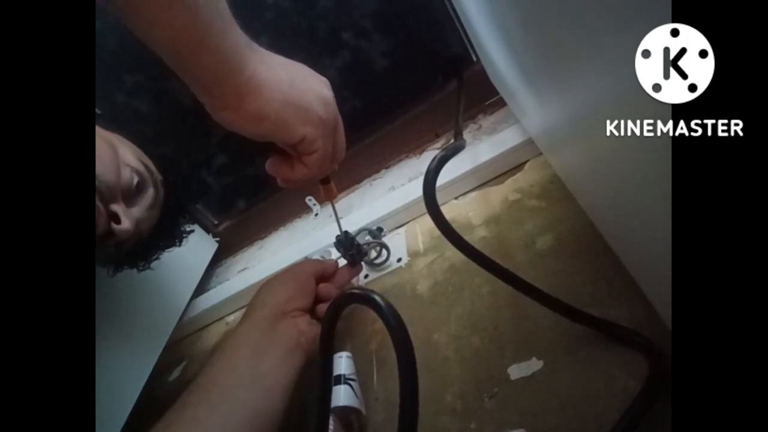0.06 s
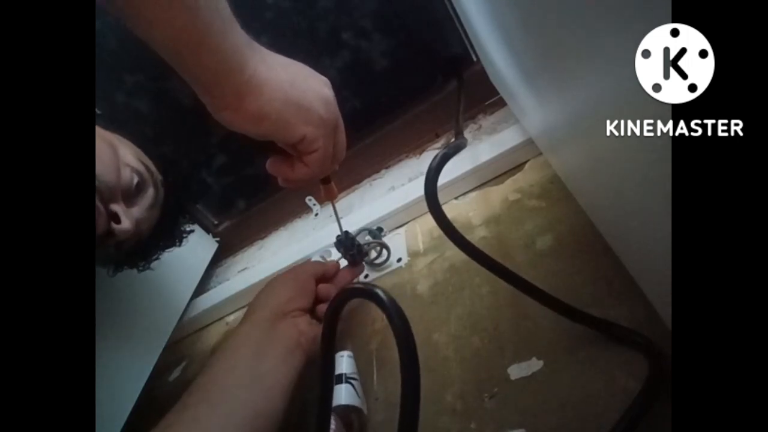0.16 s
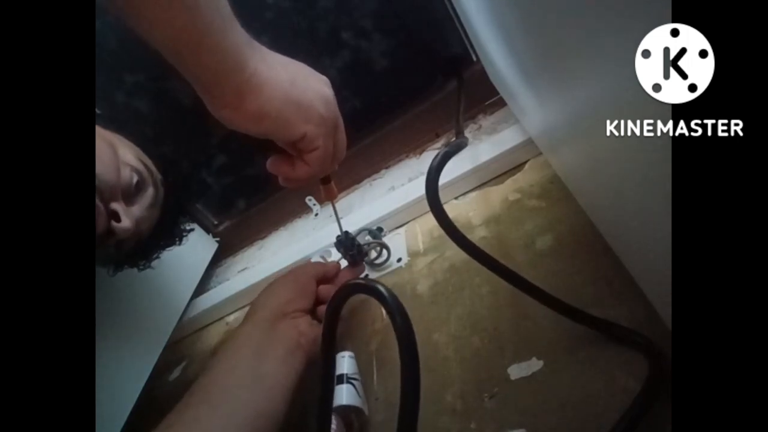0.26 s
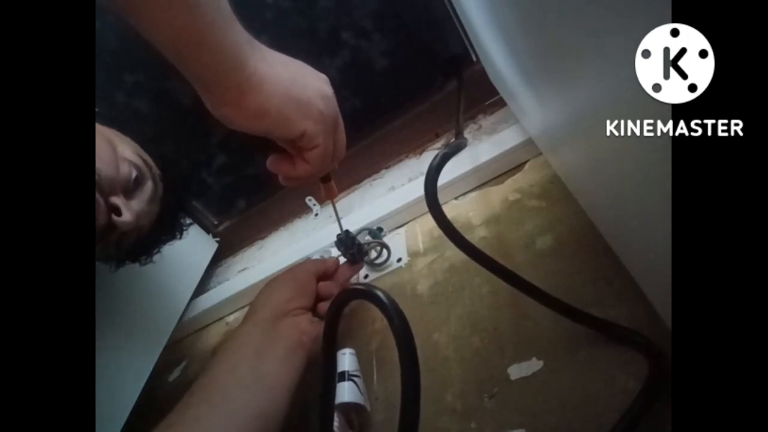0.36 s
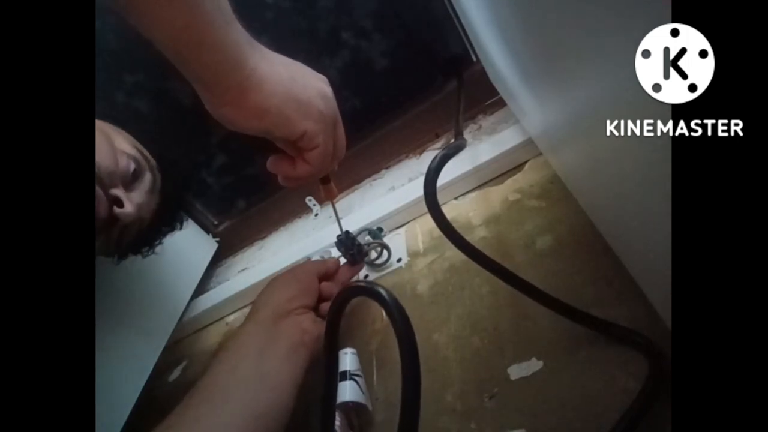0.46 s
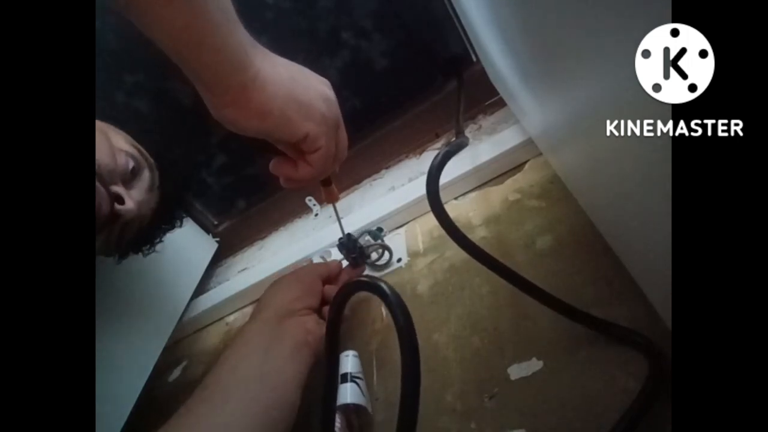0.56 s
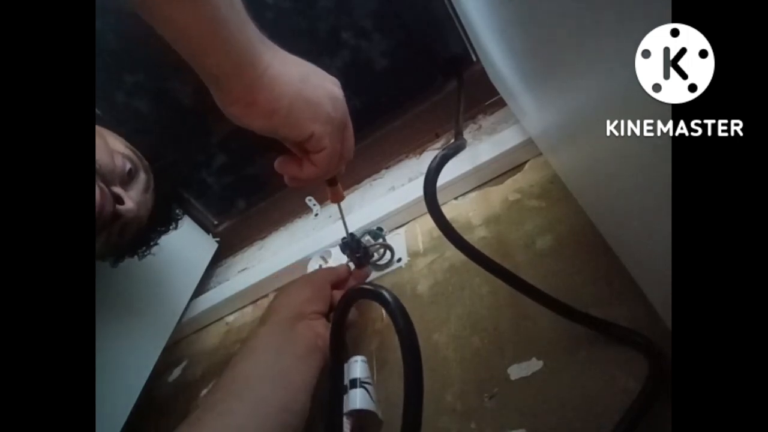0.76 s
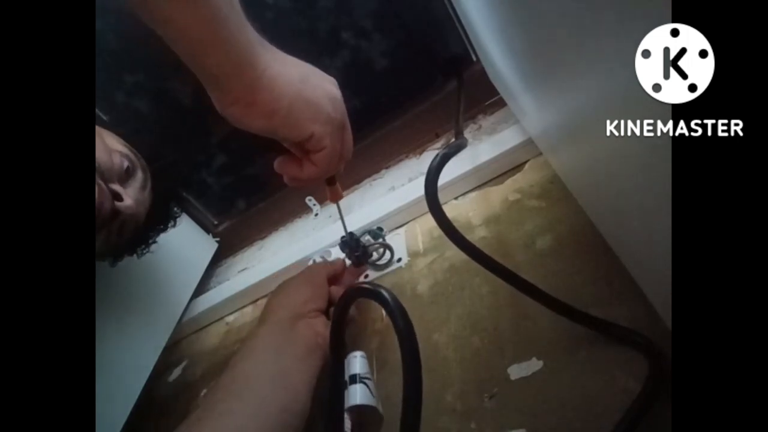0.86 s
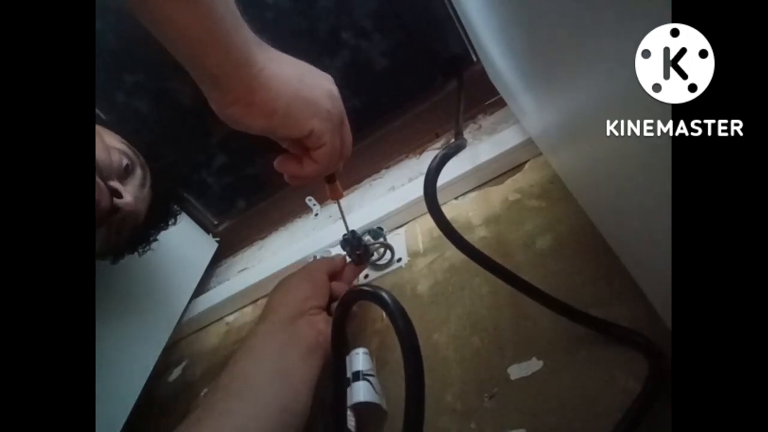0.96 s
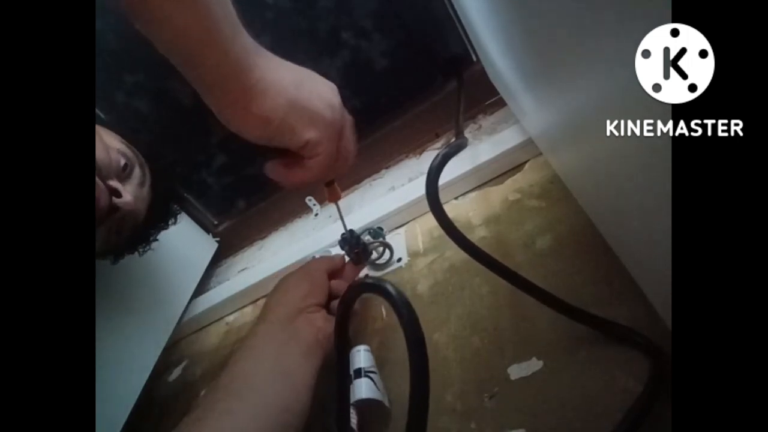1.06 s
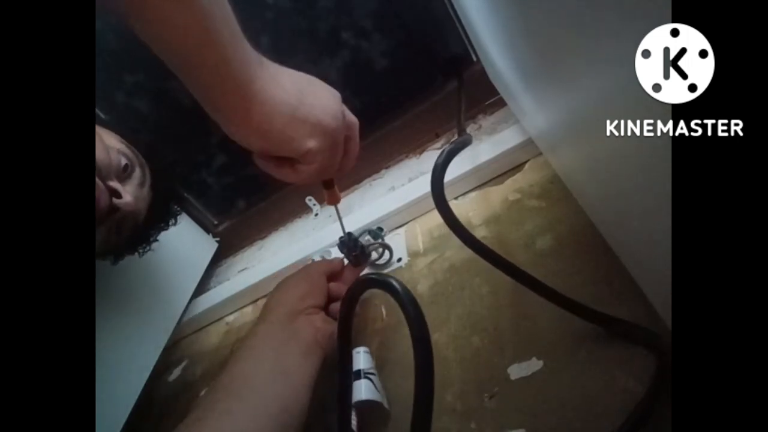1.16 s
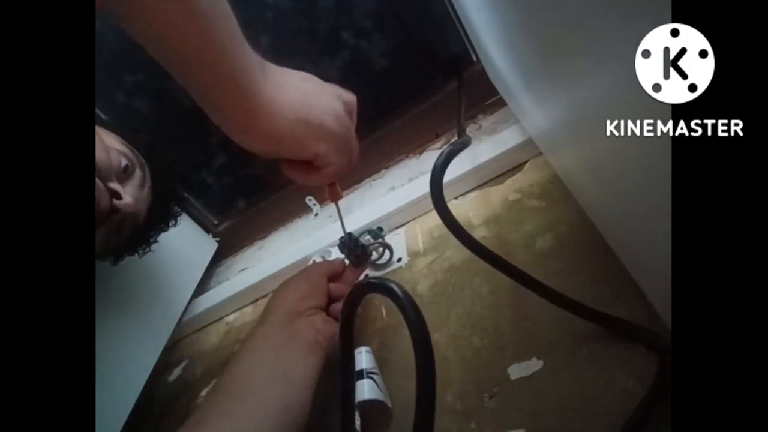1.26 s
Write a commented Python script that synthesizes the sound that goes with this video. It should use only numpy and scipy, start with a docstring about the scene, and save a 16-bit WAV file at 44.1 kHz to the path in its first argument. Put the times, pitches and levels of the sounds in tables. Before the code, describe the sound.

A screwdriver clicks and rattles on a plastic terminal block in two quick flurries, thudding the wall panel behind. A cable slides with a rough hiss, hands bump softly, and one sharp click follows, close by in a small room.

```python
"""A small room, where a screwdriver works on a plastic terminal block held against a wall panel.
The block knocks and rattles in two flurries: the plastic cracks and rings, the panel thuds behind it.
A cable slides with a rough hiss of tiny slips, hands bump and rumble on the panel, and near the end
the blade slips in a screw slot with one sharp, ringing click. Quiet room air lies underneath."""
import sys
import numpy as np
from scipy import signal
from scipy.fft import rfft, irfft
from scipy.io import wavfile

SR = 44100
rng = np.random.default_rng(int(sys.argv[2]) if len(sys.argv) > 2 else 0)


def materialize(psi):
    """Save the field psi as 16-bit PCM at rate SR to the path in sys.argv[1].

    A 1-D psi becomes a single channel; in a 2-D psi each row is a channel.
    """
    bounded = np.clip(np.atleast_2d(psi).T, -1, 1)
    quanta = np.round(bounded * 32767).astype(np.int16)
    wavfile.write(sys.argv[1], SR, quanta)


N = 57330
T = np.arange(N) / SR
CRACK_RISE_S = 0.00088

# contacts of tool and block: t/s, panel push/dB, panel thud/dB, plastic click/dB,
# click tilt/(dB per octave), click pitch/Hz, click t60/s
CONTACTS = [(0.029, -29.5, -38.5, -55.5, 3, 2600, 0.13), (0.064, -29.5, -34, -44, -2, 8540, 0.036),
            (0.219, -66, -56, -39, -1, 990, 0.16), (0.2483, -11, -11.5, -21.5, -4.5, 1080, 0.041),
            (0.258, -22.5, -17, -28.5, -2.5, 2580, 0.024), (0.274, -14.5, -18.5, -31.5, -4, 2520, 0.026),
            (0.3457, -11.5, -14.5, -13, -5.5, 1850, 0.0095), (0.3516, -23, -26, -34.5, -2, 2860, 0.037),
            (0.3605, -12.5, -20.5, -35, -1, 600, 0.057), (0.374, -28, -28.5, -31.5, -2, 2440, 0.021),
            (0.3858, -9.5, -26.5, -32, -9, 2800, 0.025), (0.3936, -9, -24.5, -59, 6, 2810, 0.028),
            (0.469, -27.5, -26.5, -35, -7, 2280, 0.13), (0.656, -47, -41, -33.5, -10, 1090, 0.077),
            (0.789, -24, -33, -35, -1.5, 2230, 0.024), (1.145, -68, -75, -47.5, 6, 2200, 0.095),
            (1.1588, -58, -57, -29, 4, 2800, 0.035), (1.164, -56, -42.5, -38, -7, 770, 0.081)]
# spectrum of the shaking wires: f/Hz, level/dB
WIRE_CHATTER = [(60, -38), (125, -3.5), (180, 6.5), (290, 2), (450, -3), (560, -2.5), (720, -8.5),
                (1000, -7), (1500, -25), (4000, -54)]


def panel_knocks():
    """Each blow pushes the panel, rings its low modes and leaves the wires shaking."""
    # modes of the wall panel: f/Hz, level/dB, t60/s, left-right/dB
    panel_modes = [(121.7, -15, 0.24, -1), (159.3, -19.5, 0.32, -5), (207, -23.5, 0.073, -21.5),
                   (267.8, -6.5, 0.11, -3.5), (351.2, -15, 0.11, 1), (403.2, -21, 0.21, -5),
                   (529, -30.5, 0.32, 8), (557.3, -16, 0.11, 18.5), (636, -20, 0.13, 17.5),
                   (796, -16, 0.044, 12.5), (945, -28.5, 0.055, -23.5)]
    softness_hz, radiation_hz = 1260, 85   # soft plastic dulls the blow; the panel radiates little bass
    push_delay_s, push_width_s, rebound_width_s = 0.0029, 0.0012, 0.0018
    starts, pushes_db, thuds_db = np.transpose(CONTACTS)[:3]
    blows = signal.sosfilt(signal.butter(2, softness_hz, fs=SR, output="sos"), clicks(starts, thuds_db))
    body = sum(from_db(db) * pan(side_db) * ring(blows, hz, t60) for hz, db, t60, side_db in panel_modes)
    body = signal.sosfilt(signal.butter(2, radiation_hz, "high", fs=SR, output="sos"), body)
    push, shake_power = 0, 0
    for start, push_db, thud_db in zip(starts, pushes_db, thuds_db):
        since = T - start - push_delay_s
        give = np.exp(-(since / push_width_s) ** 2)   # the panel gives way once and springs back
        rebound = push_width_s / rebound_width_s * np.exp(-(since / rebound_width_s) ** 2)
        push += from_db(push_db) * (rebound - give)
        shake_power += (from_db(thud_db - 6.5) * burst(T - start, rise=0.0041, t60=0.085)) ** 2
    return body + push + np.sqrt(shake_power) * noise(WIRE_CHATTER)


def block_clicks(size=8192):
    """Each contact cracks on the plastic with its own pitch and brightness, and rings the block."""
    # spectrum of the dense crack: f/Hz, level/dB
    crack_colour = [(200, -39), (500, 4), (1000, -2), (1500, 3.5), (2800, -8), (4000, -2.5), (5200, -11),
                    (8000, -9), (10500, -24), (15000, -36)]
    # modes of block and blade: f/Hz, level/dB, t60/s, left-right/dB
    block_modes = [(847, -26.5, 0.069, -11), (1167, -17.5, 0.013, 18), (1760, -21.5, 0.018, 18.5),
                   (2147, -23.5, 0.046, 6), (2365, -17.5, 0.06, -3), (2690, -12, 0.029, 13),
                   (2975, -27, 0.044, -19), (3455, -21.5, 0.031, -13), (3810, -17, 0.016, -10),
                   (7520, -27.5, 0.036, 10)]
    peak_db, peak_width_oct = 13, 0.31
    out, t = np.zeros((2, N + size)), np.arange(size) / SR
    for start, _, _, db, tilt, pitch, t60 in CONTACTS:
        def colour_db(hz):
            """A tilt above 500 Hz, with a peak at the pitch of this click."""
            peak = peak_db * np.exp(-(np.log2(hz / pitch) / peak_width_oct) ** 2)
            return peak + tilt * np.log2(np.maximum(hz, 500))
        i = int(start * SR)
        grain = coloured(rng.standard_normal((2, size)), crack_colour, colour_db)
        out[:, i:i + size] += from_db(db + 1.5) * burst(t, CRACK_RISE_S, t60) * grain
    starts, _, _, clicks_db, tilts, _, _ = np.transpose(CONTACTS)
    for hz, db, t60, side_db in block_modes:
        strikes_db = clicks_db + db + tilts * np.log2(hz / 2500)
        jitter = rng.uniform(0, 1 / hz, (2, len(starts)))   # up to one cycle, different on each side
        strikes = np.array([clicks(starts + lag, strikes_db) for lag in jitter])
        out[:, :N] += pan(side_db) * ring(strikes, hz, t60)
    return out[:, :N]


def blade_slip(start_s=1.1588, level_db=-32.5):
    """The blade snaps out of the slot; shaft and screw ring, reaching each ear in a different phase."""
    # modes of shaft and screw: f/Hz, level/dB, t60/s
    blade_modes = [(804, -3, 0.085), (1860, -4.5, 0.05), (2160, -0.5, 0.038), (2570, 0.5, 0.035),
                   (2730, 1, 0.049), (3380, -6, 0.064), (3790, -1, 0.054), (6920, -13, 0.03),
                   (8140, -13, 0.03)]
    since, out = T - start_s, 0
    for hz, db, t60 in blade_modes:
        tone = np.sin(2 * np.pi * hz * since + rng.normal(0, 1, (2, 1)))
        out += from_db(level_db + db) * burst(since, CRACK_RISE_S, t60) * tone
    return out


def cable_slide(slips_per_s=9000, fade_in_db_per_s=181):
    """Thousands of tiny slips merge into a hiss with a few narrow resonances."""
    # envelope of the slide: t/s, level/dB
    slide_envelope = [(0.427, -46), (0.49, -36), (0.649, -38), (0.692, -45.5), (0.8, -53.5), (0.99, -61.5),
                      (1.03, -90)]
    # spectrum of the hiss: f/Hz, level/dB
    hiss_colour = [(150, -6.5), (400, -1.5), (650, -3), (1200, 0.5), (2100, -2.5), (2900, 2), (4000, -0.5),
                   (5100, -8), (7700, -7.5), (9500, -17.5), (12000, -22.5)]
    # resonances in the hiss: f/Hz, level/dB, t60/s
    resonances = [(1213, -15.5, 0.051), (2122, -17, 0.44), (2917, -14, 0.031)]
    times, levels_db = np.transpose(slide_envelope)
    envelope_db = np.interp(T, times, levels_db) - fade_in_db_per_s * np.maximum(times[0] - T, 0)
    slips = rng.choice([-1, 1], (2, N)) * (rng.random((2, N)) < slips_per_s / SR)
    hiss = coloured(slips, hiss_colour)
    rings = sum(from_db(db) * rms_one(ring(hiss, hz, t60)) for hz, db, t60 in resonances)
    return from_db(envelope_db + 2.5) * (hiss + rings)


def soft_bumps():
    """Each bump is a few low cycles, pitched by where it lands, with a little shaking of the wires."""
    # hands and wires bumping the panel: t/s, level/dB, f/Hz
    bumps = [(0.437, -27.5, 283), (0.513, -29.5, 238), (0.791, -29, 132.6), (0.831, -33, 270),
             (0.869, -43, 123), (0.958, -39, 97), (1.174, -31, 264), (1.273, -36.5, 230)]
    shaking = from_db(-13) * noise(WIRE_CHATTER)
    out = 0
    for start, db, hz in bumps:
        thump = np.sin(2 * np.pi * hz * (T - start))
        out += from_db(db) * burst(T - start, rise=0.0021, t60=0.078) * (thump + shaking)
    return out


def hands():
    """The hands lean on the panel with a deep rumble and rub the cable against it."""
    # envelope of the leaning: t/s, level/dB
    lean_envelope = [(0, -62), (.22, -68), (.29, -40), (.345, -47), (.395, -33), (.5, -42), (.56, -51),
                     (.77, -49), (.8, -44), (.88, -49), (.92, -61), (1.3, -65)]
    # spectrum of its rumble: f/Hz, level/dB
    rumble_colour = [(30, -19), (60, -14), (88, 0), (115, 0), (160, -5), (220, -13), (500, -36),
                     (2000, -65)]
    # envelope of the rubbing: t/s, level/dB
    rub_envelope = [(0, -59.5), (.08, -51), (.17, -63.5), (.3, -42.5), (.45, -41.5), (.58, -49),
                    (.74, -44.5), (.85, -48), (.91, -58), (1.04, -63.5), (1.1, -57.5), (1.24, -58.5),
                    (1.3, -55)]
    # spectrum of the rubbing: f/Hz, level/dB
    rub_colour = [(100, -46), (190, -6.5), (265, 6.5), (400, -10), (540, -3), (900, -16.5), (1500, -48)]
    return sum(from_db(np.interp(T, *np.transpose(envelope))) * noise(colour)
               for envelope, colour in [(lean_envelope, rumble_colour), (rub_envelope, rub_colour)])


def lingering_tone(hz=738, start_s=0.035):
    """A faint tone rings on after an early tap."""
    return from_db(-57.5) * decay(T - start_s, t60=2.2) * np.sin(2 * np.pi * hz * T)


def room_tail(x):
    """The small room answers with a faint diffuse tail, different on each side."""
    tail = rng.standard_normal((2, N)) * decay(T, t60=0.34)
    return from_db(-11.5) * signal.fftconvolve(x, rms_one(tail) / np.sqrt(N), axes=1)[:, :N]


def room_air():
    """A steady, bass-heavy bed of quiet air."""
    # spectrum of the room tone: f/Hz, level/dB
    air_colour = [(20, 0.5), (40, -5), (110, -10), (190, -22), (290, -21.5), (1000, -24), (1600, -30),
                  (3000, -29), (7700, -35), (15000, -43.5)]
    return from_db(-52) * noise(air_colour)


def from_db(db):
    """Decibels to gain."""
    return 10 ** (np.asarray(db) / 20)


def rms_one(x):
    """Scale to unit rms."""
    return x / np.sqrt(np.mean(x ** 2) + 1e-20)


def at_hz(points, hz):
    """Read a table on a log-frequency axis."""
    f, value = np.transpose(points)
    return np.interp(np.log(np.maximum(hz, 1)), np.log(f), value)


def pan(db):
    """Left and right gains for a level difference."""
    return from_db(np.array([[.5], [-.5]]) * db)


def decay(t, t60):
    """Exponential fall, silent before t = 0."""
    return (t >= 0) * np.exp(-np.log(1000) * np.maximum(t, 0) / t60)


def burst(t, rise, t60):
    """Quick attack, exponential fall; times in seconds."""
    return decay(t, t60) * (1 - np.exp(-np.maximum(t, 0) / rise))


def clicks(times, db):
    """One impulse per contact."""
    out = np.zeros(N)
    np.add.at(out, (times * SR).astype(int), from_db(db))
    return out


def ring(x, hz, t60):
    """A unit click sets a sine of height 1 ringing."""
    r, w = np.exp(-np.log(1000) / (t60 * SR)), 2 * np.pi * hz / SR
    return signal.lfilter([0, np.sin(w)], [1, -2 * r * np.cos(w), r * r], x + 1e-18)


def coloured(pair, spectrum, extra_db=lambda hz: 0):
    """Two unrelated noises become one stereo sound of the given colour, wide in the treble; rms 1."""
    # how alike the two sides are: f/Hz, correlation
    likeness = [(30, 0), (80, 0.94), (290, 0.94), (640, 0.21), (1400, 0), (15000, 0)]
    # stereo balance: f/Hz, left-right/dB
    balance = [(100, -1), (380, -1.5), (700, 7), (1100, 2), (2400, 1.5), (4400, 0.5), (8100, 6.5),
               (12000, -3.5)]
    size = pair.shape[1]
    hz = np.maximum(np.arange(size // 2 + 1) * SR / size, 1)
    mid, side = rfft(pair)
    alike = at_hz(likeness, hz)
    stereo = np.sqrt(1 + alike) * mid + np.sqrt(1 - alike) * side * [[1], [-1]]
    gain = from_db(at_hz(spectrum, hz) + extra_db(hz)) * pan(at_hz(balance, hz))
    return rms_one(irfft(stereo * gain, size))


def noise(spectrum):
    """Coloured stereo noise."""
    return coloured(rng.standard_normal((2, N)), spectrum)


def scene():
    """Contacts, cable and hands over quiet air; only the sharp clicks feed the room tail."""
    sharp = block_clicks() + blade_slip()
    impacts = panel_knocks() + soft_bumps() + sharp + room_tail(sharp)
    return impacts + cable_slide() + hands() + lingering_tone() + room_air()


def record(dry):
    """The microphone loses the deepest bass; the top is cut steeply."""
    low_cut_hz, high_cut_hz = 20, 15550
    thin = signal.sosfilt(signal.butter(1, low_cut_hz, "high", fs=SR, output="sos"), dry)
    return signal.sosfilt(signal.ellip(10, .2, 70, high_cut_hz, fs=SR, output="sos"), thin)


dry = scene()
out = record(dry)
materialize(out)
```